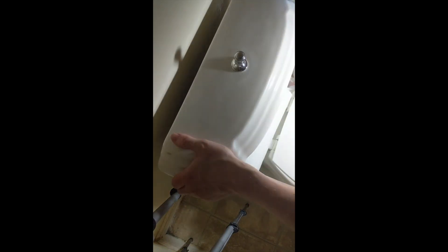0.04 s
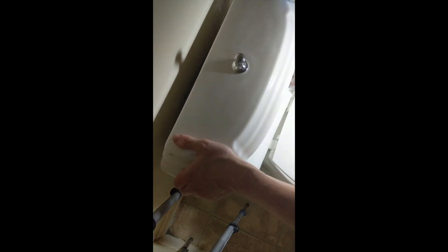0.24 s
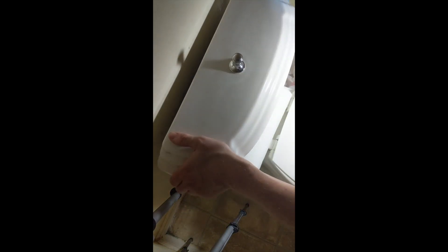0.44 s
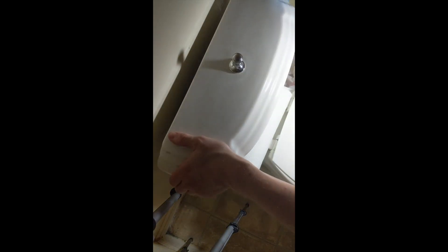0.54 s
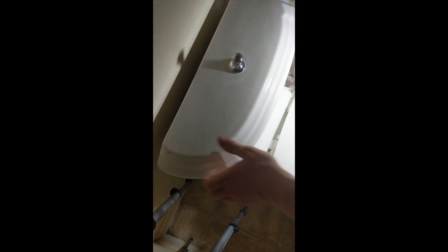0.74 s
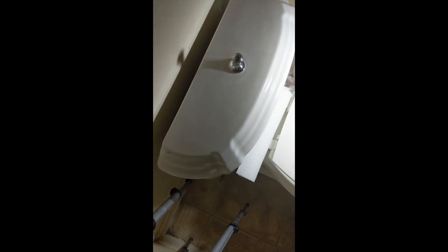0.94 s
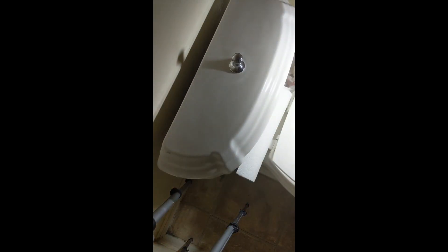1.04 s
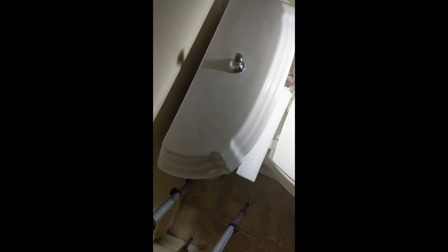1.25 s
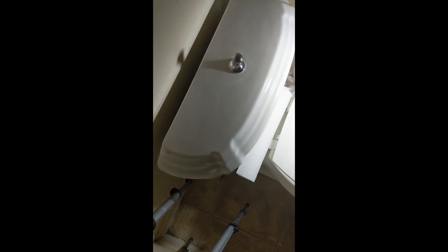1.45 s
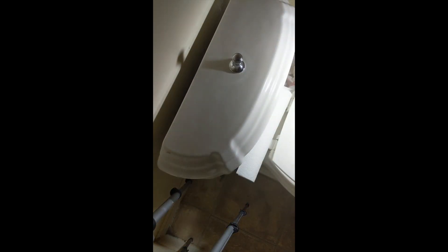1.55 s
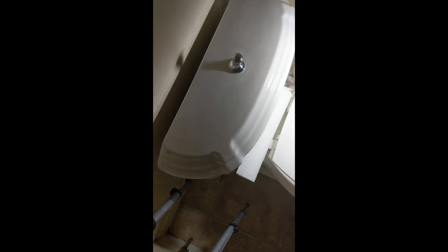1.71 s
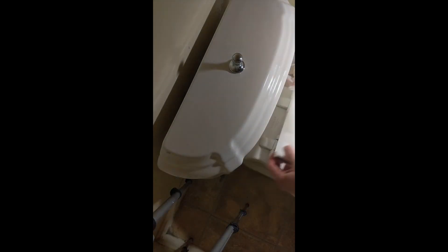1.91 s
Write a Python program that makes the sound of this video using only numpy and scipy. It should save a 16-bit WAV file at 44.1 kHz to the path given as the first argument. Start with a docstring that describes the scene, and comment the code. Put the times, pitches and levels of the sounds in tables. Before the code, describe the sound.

Porcelain toilet tank lid scrapes briefly, settles with ringing clunks, then quiet drips and soft bumps

```python
"""A porcelain lid grates over a toilet tank and settles in a quick run of clunks, close to the microphone
in a small bathroom: filtered noise for the scrape, ringing modes and noise bursts for the clunks.
Behind it, refilling water hisses faintly as coloured noise, duller once the lid is down; drips and tiny
bubbles ping inside the tank as short wavering tones. Light ticks of contact are bursts of noise.
Near the end a hand softly bumps the fixture three times, the first a close double: low hollow modes."""
import sys
import numpy as np
from scipy import signal
from scipy.fft import rfft, irfft, next_fast_len
from scipy.io import wavfile
from scipy.ndimage import uniform_filter1d, map_coordinates

SR = 44100
rng = np.random.default_rng(int(sys.argv[2]) if len(sys.argv) > 2 else 0)


def transcribe(u):
    """Save the signal u as a 16-bit wav file named by the first command-line argument.

    u: samples, shape (n,) or (channels, n), limited to [-1, 1]; the rate is SR.
    q: integer samples, one column per channel.
    """
    v = np.clip(np.atleast_2d(u).T, -1, 1)
    q = np.round(v * 32767).astype(np.int16)
    wavfile.write(sys.argv[1], SR, q)


N = 85995

# Water hiss, colour: pitch_hz, density_db [dB per Hz]
HISS_COLOUR = [(350, -47.5), (600, -36.5), (634, 1.5), (843, -14), (1020, 2), (1150, -8), (1340, -5.5),
               (1880, -7.5), (2100, -14), (2830, -7), (15500, -21)]
# Water hiss, loudness over time: time_s, level_db
HISS_LEVEL = [(0, -68), (.23, -62), (.55, -70), (0.801, -71.5), (1.5, -71.5), (1.95, -73)]
# Low rumble, also the colour of the hand's push: pitch_hz, density_db [dB per Hz]
RUMBLE_COLOUR = [(20, -37), (55, -24), (80, -4), (110, -0.5), (145, 0.5), (200, -5.5), (400, -9.5),
                 (650, -16.5), (1200, -28)]
# Resonances of the air in the tank: pitch_hz, width_hz, level_db
TANK_AIR = [(1010, 98, -8.5), (1352, 21, 0), (1798, 26, 3), (1936, 200, -12), (2290, 86, -8)]
# Water heard through the gap under the lid: pitch_hz, density_db [dB per Hz]
GAP_RUSH_COLOUR = [(180, -38.5), (300, -13), (365, -27.5), (459, -13.5), (855, -26), (1090, 11),
                   (1370, -2.5), (1570, -5), (2560, -3.5), (3920, -4), (15000, -13.5)]
# Fine spatter of the inflow: pitch_hz, density_db [dB per Hz]
SPRAY_COLOUR = [(2500, -22), (5000, 1.5), (8000, -3), (15000, -0.5)]
# Drips and bubbles: start_s, pitch_hz, level_db
DRIPS = [(.008, 4380, -46), (0.09, 5460, -45.5), (.102, 7700, -43.5), (0.647, 7540, -51),
         (0.734, 7300, -50.5), (.746, 2167, -52.5), (.756, 2120, -90), (.787, 4830, -54),
         (0.854, 8600, -44.5), (.978, 2105, -59), (1.042, 2080, -61), (1.153, 9300, -45.5),
         (1.213, 2430, -53.5), (1.24, 2155, -61), (1.28, 1542, -65), (1.326, 2092, -58.5),
         (1.335, 1686, -66), (1.435, 2233, -62), (1.522, 4580, -51.5), (1.604, 4390, -55),
         (1.696, 9430, -53), (1.717, 5410, -58.5), (1.755, 5880, -60), (1.786, 2124, -56),
         (1.815, 2334, -65.5), (1.908, 2330, -58)]
# Echo inside the tank: pitch_hz, t60_s
TANK_T60 = [(1000, 0.36), (2300, 0.18), (9000, 0.027)]
# Echo of the bathroom: pitch_hz, t60_s
ROOM_T60 = [(110, 0.6), (300, 0.69), (1200, 0.21), (4000, 0.33), (12000, 0.05)]
# Light ticks of contact: start_s, level_db
TICKS = [(0.305, -47.5), (0.351, -52.5), (1.56, -60), (1.649, -60), (1.669, -58.5), (1.860, -62),
         (1.875, -56.5), (1.904, -57)]
# Colour of a tick: pitch_hz, density_db [dB per Hz]
TICK_COLOUR = [(300, 3.5), (1500, -1), (4500, -2), (8000, -3), (16000, -11)]
# Soft bumps of the hand: start_s, level_db, brightness_hz, lowest_pitch_hz
BUMPS = [(1.565, -48.5, 293, 190), (1.577, -49.5, 354, 198), (1.652, -46.5, 910, 140),
         (1.877, -45, 297, 172)]
# Hollow modes of the bumped fixture: pitch_hz, level_db, t60_s
HOLLOW_MODES = [(155, -5, 0.23), (237.3, 0, 0.11), (289, -6.5, 0.16), (399.5, -5, 0.29), (477.6, -11, 0.31),
                (499, -11.5, 0.25), (705, -12, 0.073), (1122, -3, .08)]
# Lid grating on the rim, colour: pitch_hz, density_db [dB per Hz]
SCRAPE_COLOUR = [(35, -83), (60, -42), (145, 3.5), (248, -14), (497, -8), (792, -45.5), (1320, -15.5),
                 (2470, -18.5), (3840, -23.5), (4220, -20), (6260, -29.5), (11500, -24), (15500, -24.5)]
# Lid grating on the rim, loudness over time: time_s, level_db
SCRAPE_LEVEL = [(0, -65.5), (.09, -60), (.112, -50), (.165, -51), (0.194, -60), (.235, -58.5), (.31, -67),
                (.42, -60), (.48, -83)]
# Lid meeting tank: start_s, level_db, brightness_hz, ring_db, thump_db, low_weight_db, ping_weight_db
CLUNKS = [(0.2388, -24, 4467, 1, -1, 2, 0.5), (0.316, -27, 1500, 7, 9.5, 2.5, -3.5),
          (0.3797, -23, 9700, 1.5, -5.5, 1, 2.5), (0.4276, -18, 10700, -1, 5.5, -4, -2),
          (0.4428, -26, 5000, -7, 2, -18, -3)]
# Porcelain modes: pitch_hz, level_db, t60_s
PORCELAIN_MODES = [(448, -7, .15), (902, -17, .12), (1169, -10, .12), (1301, -4, .16), (1563, -14, .13),
                   (1795, -14, .15), (2324, -13, .11), (2428, -3, .155), (2785, -8, .08), (3010, -17, .11),
                   (4375, -15, .09), (8080, -21, .09), (490, -12, .11), (607, -13, .08), (790, -20, .12),
                   (961, -19, .18), (1020, -18, .22), (1115, -8, .08), (1251, -13, .11), (2490, -14, .13),
                   (2665, -12, .07), (3095, -20, .11), (3480, -21, .12), (3689, -22, .11), (4600, -22, .08),
                   (6110, -28, .13)]
# Dense, short ring between the porcelain modes: pitch_hz, density_db [dB per Hz]
CLATTER_COLOUR = [(60, -59), (95, -37), (150, -2.5), (250, 1), (350, -1.5), (700, -5.5), (1150, 4),
                  (1500, 0.5), (2050, -5.5), (2650, 4.5), (3500, -10), (5500, -16.5), (8000, -24.5),
                  (10000, -35), (16000, -15.5)]
# Thump of tank and wall: pitch_hz, level_db, t60_s
THUMP_MODES = [(110, -29.5, 0.31), (145.4, -12, 0.14), (186, -15.5, 0.082), (251.6, -16.5, 0.11)]

TOP_HZ = 15900  # nothing is heard above this


def amp(db):
    """Decibels to gain."""
    return 10 ** (np.asarray(db) / 20)


def unit(x):
    """Scale to rms 1."""
    return x / np.sqrt(np.mean(x ** 2) + 1e-20)


def along(points, hz):
    """Read (pitch, value) points at any pitch, on a log pitch axis."""
    pitch_hz, value = np.transpose(points)
    return np.interp(np.log(hz + 1), np.log(pitch_hz + 1), value)


def clock():
    """Seconds, one value per sample."""
    return np.arange(N) / SR


def level_gain(points):
    """Gain over time, read between (time, level) points."""
    return amp(np.interp(clock(), *np.transpose(points)))


def decay(t, t60_s):
    """Exponential decay, 60 dB down after t60_s."""
    return np.exp(-np.log(1000) * t / t60_s)


def filtered(x, response):
    """Multiply the spectrum of x by a response of frequency."""
    size = next_fast_len(N + SR // 2)
    hz = np.fft.rfftfreq(size, 1 / SR)
    return irfft(rfft(x, size) * response(hz), size)[:N]


def noise(colour):
    """Coloured noise of rms 1."""
    return unit(filtered(rng.standard_normal(N), lambda hz: amp(along(colour, hz))))


def patchy(x, depth_db):
    """Let a sound flicker in patches of time and pitch, at rms 1."""
    bins = signal.stft(x, nperseg=256)[2]
    field = uniform_filter1d(rng.standard_normal(bins.shape), size=4, axis=0)  # across pitch
    field = uniform_filter1d(field, size=10, axis=1)  # across time
    flickering = signal.istft(bins * amp(depth_db * unit(field)), nperseg=256)[1]
    return unit(flickering[:N])


def soften(x, hz, order):
    """A softer contact passes less treble."""
    low_pass = signal.butter(order, min(hz, .45 * SR), fs=SR, output="sos")
    return signal.sosfilt(low_pass, x)


def ring(modes, attack_s, scatter_db):
    """Damped modes that swell briefly, each a little different in strength at every blow."""
    t = clock()
    tones = np.zeros(N)
    for hz, db, t60_s in modes:
        strength = amp(db + scatter_db * rng.normal())
        tones += strength * decay(t, t60_s) * np.sin(2 * np.pi * (hz * t + rng.random()))
    return tones * (1 - np.exp(-t / attack_s))


def add(track, start_s, sound):
    """Mix a sound into the track from start_s."""
    start = int(np.clip(start_s * SR, 0, N - 1))
    track[start:start + len(sound)] += sound[:N - start]


def echo(x, t60_points):
    """Diffuse tail of an enclosure: noise that dies at its own speed in each band."""
    hz, t, bins = signal.stft(rng.standard_normal(SR // 2), SR, nperseg=256)
    dying = bins * decay(t, along(t60_points, hz)[:, None])
    tail = signal.istft(dying, SR, nperseg=256)[1]
    return signal.fftconvolve(x, tail / np.linalg.norm(tail))[:N]


def tank_air_response(hz):
    """The air in the tank favours bands around its resonances."""
    return sum(amp(db) * 1j * hz * width / (centre ** 2 - hz ** 2 + 1j * hz * width)
               for centre, width, db in TANK_AIR)


def refill():
    """Inflowing water: hiss, the tank's air resonances, low rumble and a rush that the lid shuts in."""
    closed_s, closing_s = 0.36, 0.2  # moment the gap is shut, time it takes to close
    hiss = level_gain(HISS_LEVEL) * patchy(noise(HISS_COLOUR), depth_db=1.9)
    tank_air = amp(-74.5) * unit(filtered(rng.standard_normal(N), tank_air_response))
    rumble = amp(-66) * noise(RUMBLE_COLOUR)
    gap = np.clip((closed_s - clock()) / closing_s, 0, 1)  # 1 open, 0 shut
    rush = amp(-62) * gap * patchy(noise(GAP_RUSH_COLOUR), depth_db=3)
    return hiss + tank_air + rumble + rush


def spray():
    """The inflow spatters in short, scattered flecks of treble."""
    return amp(-75) * patchy(noise(SPRAY_COLOUR), depth_db=5.5)


def fizz():
    """Tiny bubbles scattered at random in time, pitch and level, as rows like those of DRIPS."""
    bubbles = []
    for _ in range(70):
        start_s = rng.uniform(0, N / SR)
        pitch_hz = min(9000 * np.exp(.35 * rng.normal()), TOP_HZ)
        bubbles.append((start_s, pitch_hz, -65 + 3 * rng.normal()))
    return bubbles


def drips():
    """Drips and fizz ping with unsteady, slightly rising pitch and echo inside the tank."""
    decay_cycles, rise, attack_s = 217, 0.0024, 0.0067  # cycles to fall 60 dB, share of pitch, s
    waver_hz, wavers_per_s = 85, 600
    out, t = np.zeros(N), clock()[:SR // 6]
    for start_s, hz, db in DRIPS + fizz():
        age = hz * t / decay_cycles  # 1 when 60 dB down
        waver = waver_hz * map_coordinates(rng.standard_normal(wavers_per_s), [t * wavers_per_s])
        pitch_hz = hz * (1 + rise * np.minimum(age, 1)) + waver
        tone = np.sin(2 * np.pi * np.cumsum(pitch_hz) / SR)
        add(out, start_s, amp(db) * tone * decay(age, 1) * (1 - np.exp(-t / attack_s)))
    return out + amp(-2.5) * echo(out, TANK_T60)


def ticks():
    """Light, dry ticks of contact: decaying bursts of noise."""
    out = np.zeros(N)
    for start_s, db in TICKS:
        add(out, start_s, amp(db) * noise(TICK_COLOUR) * decay(clock(), 0.091))
    return out


def hand_bumps():
    """The hand's short push sounds with the fixture's hollow modes; soft contact keeps the bumps dull."""
    out = np.zeros(N)
    for start_s, db, bright_hz, lowest_hz in BUMPS:
        hollow = ring(HOLLOW_MODES, attack_s=0.0011, scatter_db=1.5)
        push = amp(4.5) * noise(RUMBLE_COLOUR) * decay(clock(), 0.03)
        bump = soften(hollow + push, bright_hz, order=2)
        high_pass = signal.butter(2, lowest_hz, "highpass", fs=SR, output="sos")
        add(out, start_s, amp(db) * signal.sosfilt(high_pass, bump))
    return out


def lid_scrape():
    """The lid grates unevenly along the rim before it seats: noise roughened by small random slips."""
    rough_db, slips_per_s = 1.6, 180
    slips = map_coordinates(rng.standard_normal(N), [clock() * slips_per_s])
    grating = unit(patchy(noise(SCRAPE_COLOUR), depth_db=4.0) * amp(rough_db * slips))
    return level_gain(SCRAPE_LEVEL) * grating


def contact_weight_db(hz, low_db, ping_db):
    """The point of contact favours or starves the modes around a low and a high pitch."""
    def near(centre_hz):
        octaves = np.log2((hz + 1) / centre_hz)
        return np.exp(-.5 * (octaves / .2) ** 2)

    return low_db * near(490) + ping_db * near(2550)


def lid_clunks():
    """Each contact cracks, rings the porcelain and thumps the tank; where it lands colours the ring."""
    out, t = np.zeros(N), clock()
    for start_s, db, bright_hz, ring_db, thump_db, low_db, ping_db in CLUNKS:
        modes = [(hz, level_db + contact_weight_db(hz, low_db, ping_db), t60_s)
                 for hz, level_db, t60_s in PORCELAIN_MODES]
        dense = filtered(noise(CLATTER_COLOUR), lambda hz: amp(contact_weight_db(hz, low_db, ping_db)))
        clatter = amp(-4) * dense * decay(t, 0.13)
        crack = amp(-2.5) * dense * decay(t, 0.045)
        porcelain = amp(ring_db) * ring(modes, attack_s=0.00039, scatter_db=1)
        thump = amp(thump_db) * ring(THUMP_MODES, attack_s=0.0017, scatter_db=1)
        blow = clatter + crack + porcelain + thump
        add(out, start_s, amp(db) * soften(blow, bright_hz, order=4))
    return out


def scene():
    """Lid, hand and ticks close by with a faint room echo, over the water in the tank."""
    near = lid_clunks() + lid_scrape() + hand_bumps() + ticks()
    room = amp(-25) * echo(near, ROOM_T60)
    water = drips() + spray() + refill()
    return (near + room + water)[None]


def record(dry):
    """The microphone loses deep bass and top; a gentle gain control ducks during and after loud sounds."""
    threshold_db, slope, smoothing_s = -39, 0.19, 0.071  # slope: dB of cut per dB over threshold
    high_pass = signal.butter(5, 88, "highpass", fs=SR, output="sos")
    thin = signal.sosfilt(high_pass, dry[0])
    keep = np.exp(-1 / (smoothing_s * SR))
    power = signal.lfilter([1 - keep], [1, -keep], thin ** 2)
    heard_db = 10 * np.log10(power + 1e-12)
    ducked = thin * amp(-slope * np.maximum(heard_db - threshold_db, 0))
    return filtered(ducked, lambda hz: hz < TOP_HZ)[None]


dry = scene()
out = record(dry)
transcribe(out)
```